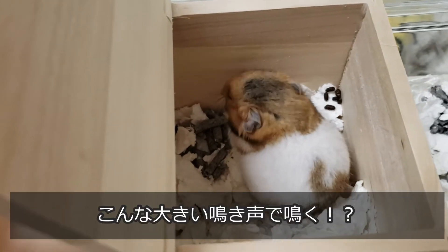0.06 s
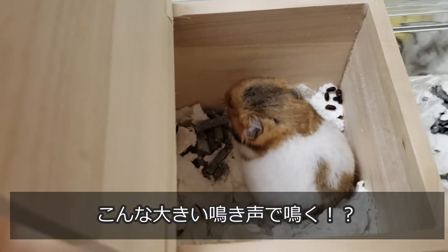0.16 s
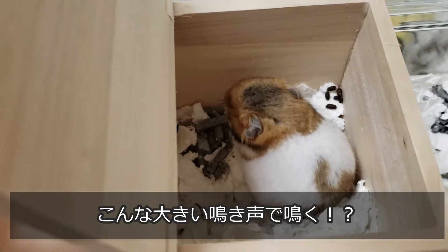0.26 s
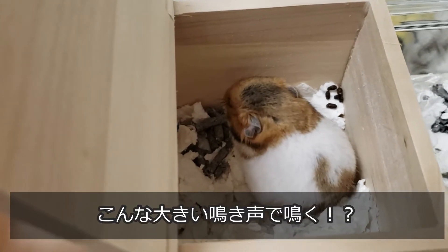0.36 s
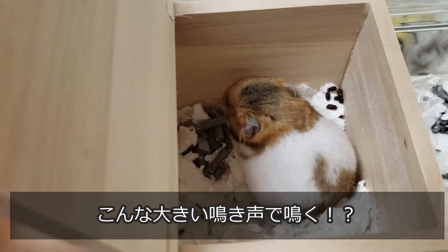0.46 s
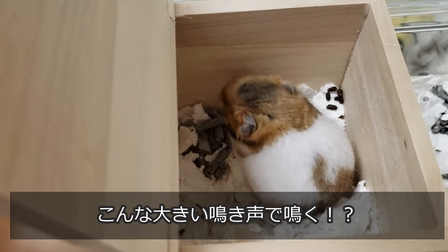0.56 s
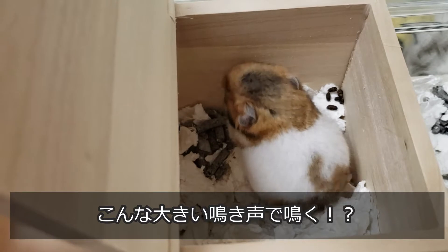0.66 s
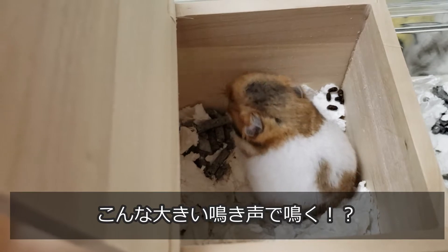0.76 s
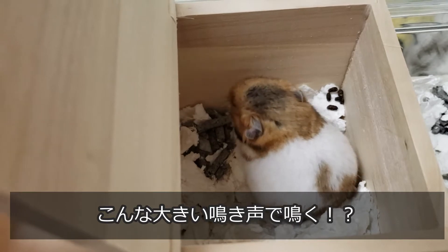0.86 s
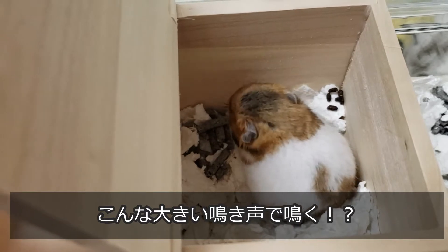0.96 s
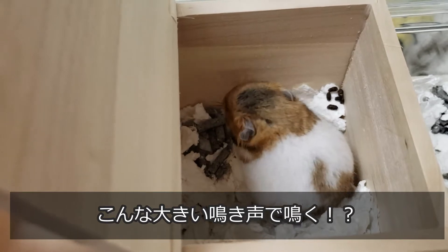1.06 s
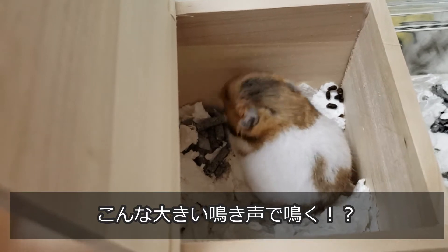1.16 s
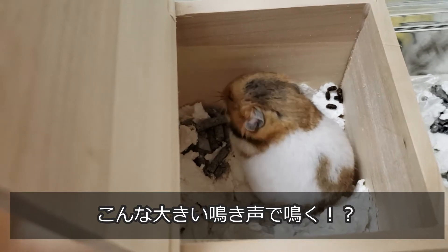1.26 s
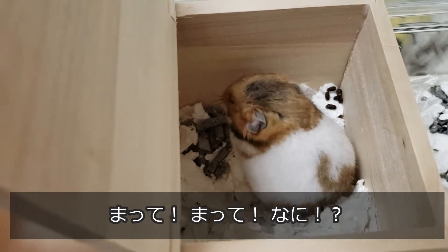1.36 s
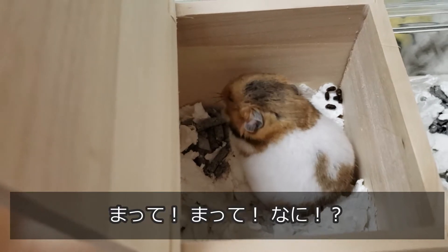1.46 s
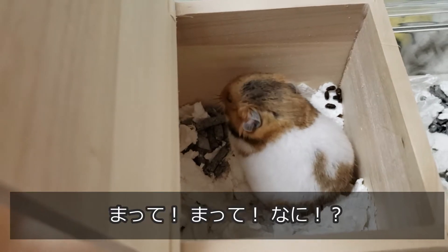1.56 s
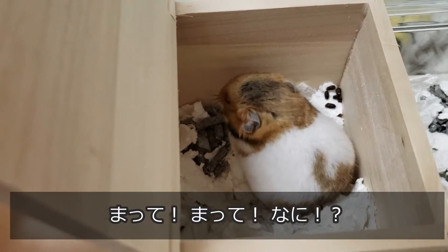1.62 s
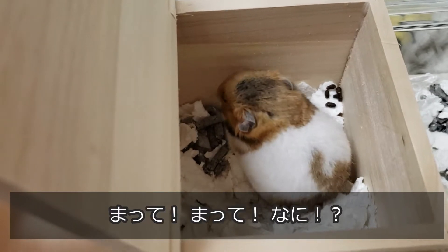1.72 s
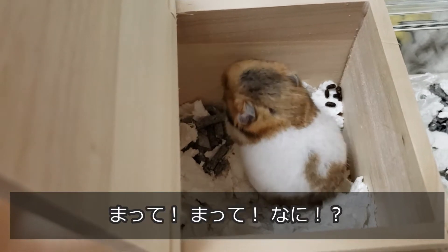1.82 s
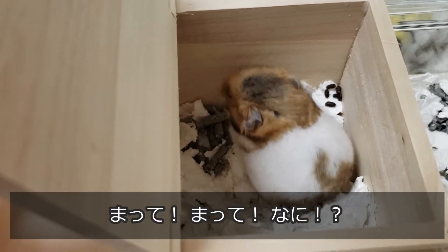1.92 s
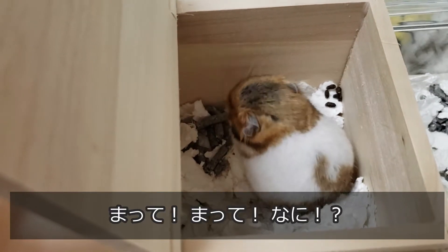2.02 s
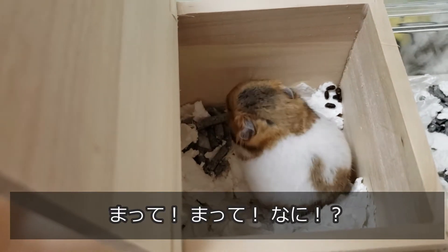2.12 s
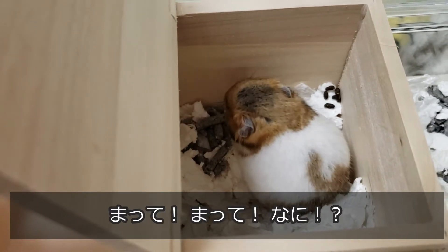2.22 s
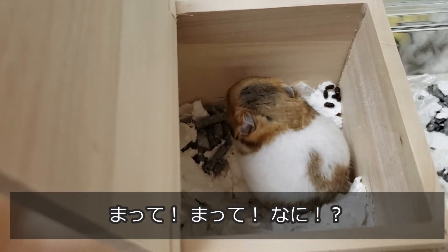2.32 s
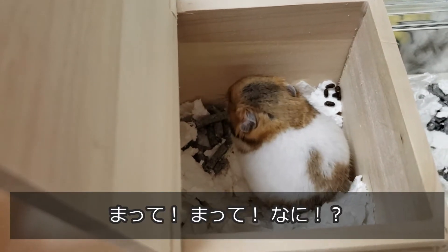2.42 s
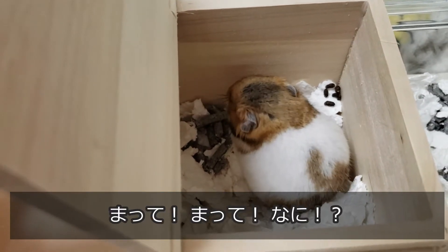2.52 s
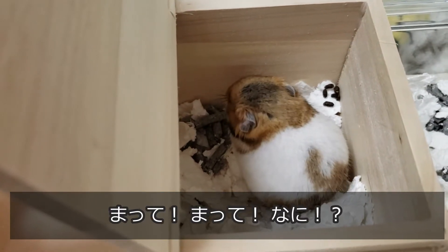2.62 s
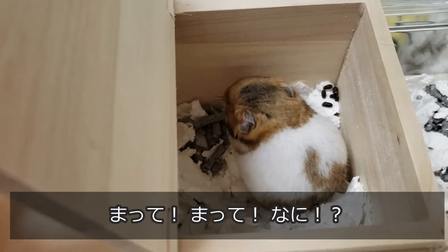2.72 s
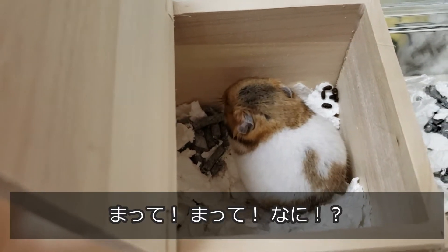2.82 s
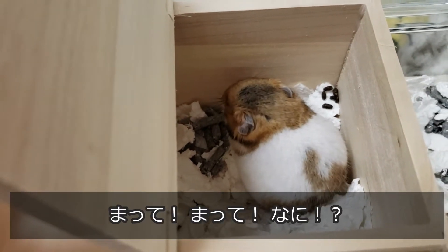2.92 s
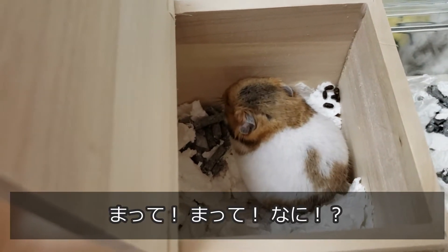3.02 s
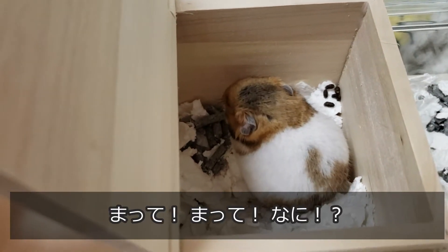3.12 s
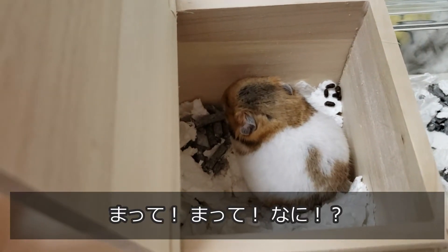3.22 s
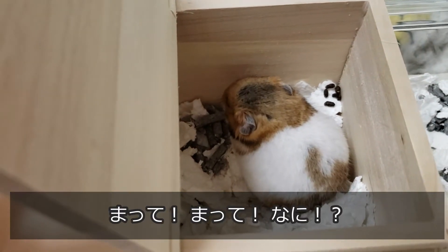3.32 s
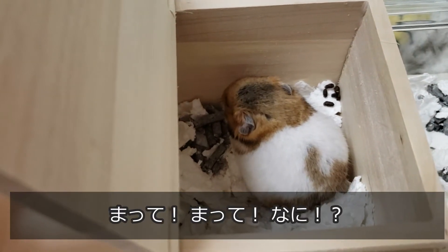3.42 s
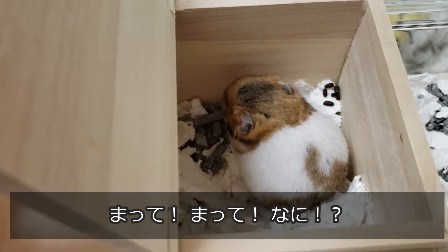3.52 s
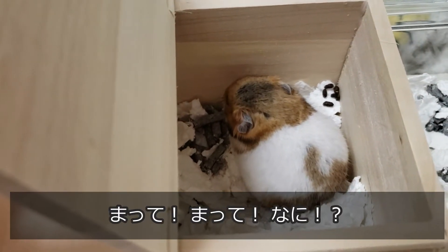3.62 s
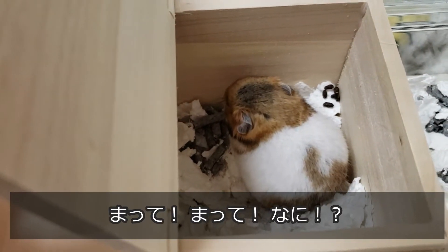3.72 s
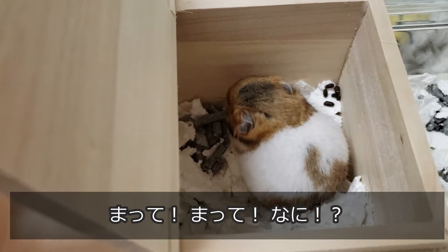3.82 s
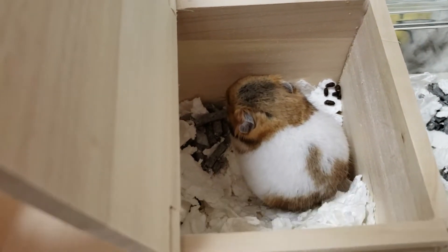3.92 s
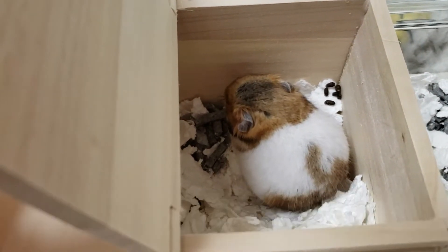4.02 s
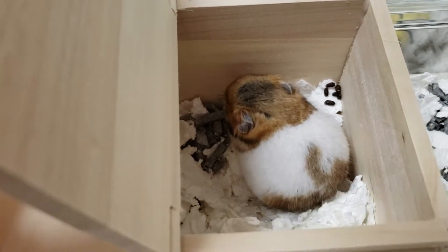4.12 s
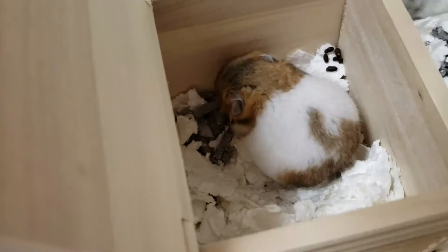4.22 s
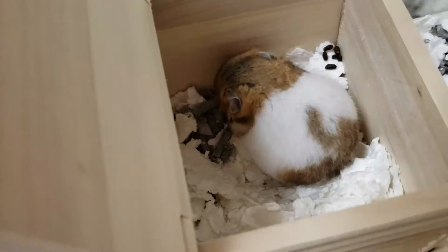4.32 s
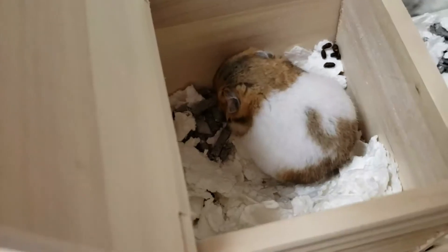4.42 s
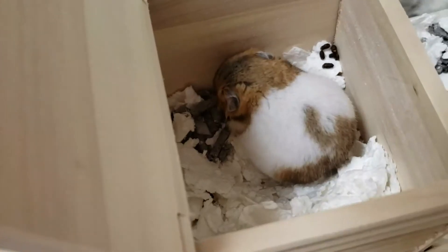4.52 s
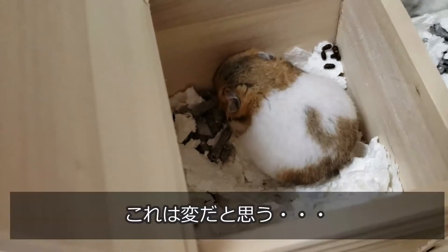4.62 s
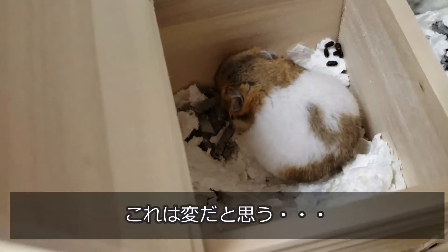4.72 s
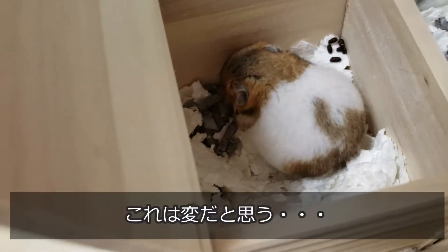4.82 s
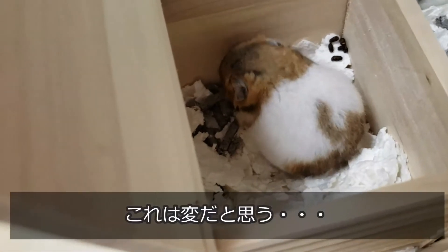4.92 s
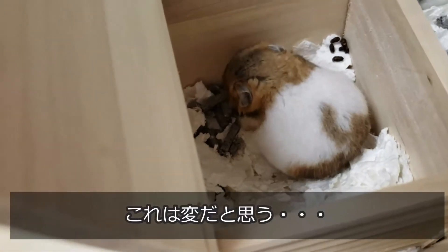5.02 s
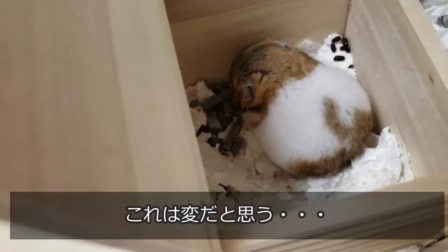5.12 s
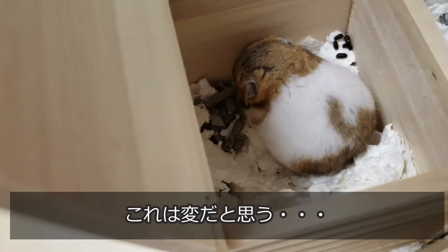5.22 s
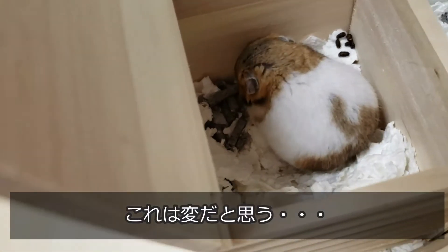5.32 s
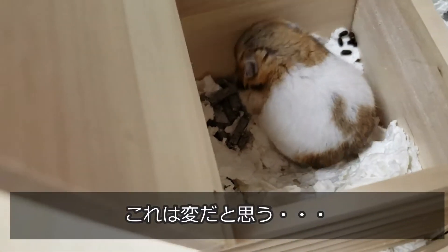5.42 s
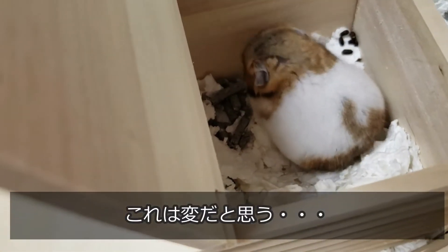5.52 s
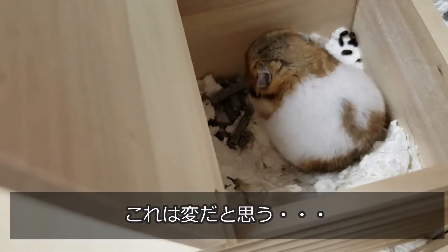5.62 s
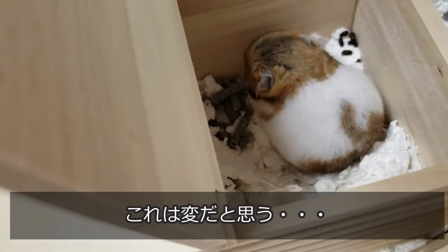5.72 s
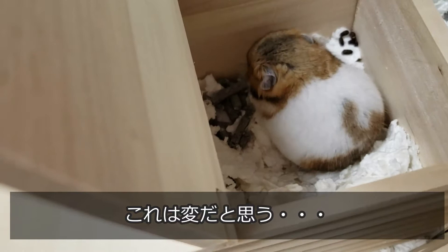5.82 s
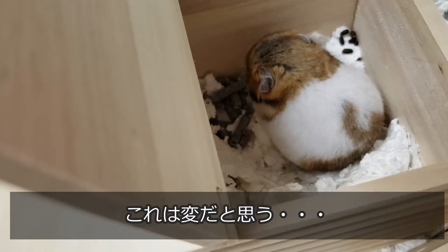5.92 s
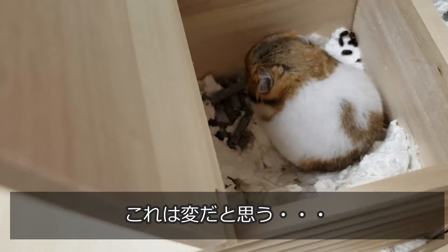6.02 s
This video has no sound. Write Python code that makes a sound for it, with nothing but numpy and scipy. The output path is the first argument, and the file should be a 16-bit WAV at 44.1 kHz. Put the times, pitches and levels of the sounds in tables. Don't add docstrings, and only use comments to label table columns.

```python
import sys
import numpy as np
from scipy import signal
from scipy.io import wavfile
from scipy.ndimage import uniform_filter1d

SR = 44100
rng = np.random.default_rng(int(sys.argv[2]) if len(sys.argv) > 2 else 0)


def undo_db(level):
    steps = np.asarray(level, float) / 20
    return 10 ** steps


def to_wav(sig):
    pcm = np.clip(np.atleast_2d(sig), -1, 1) * 32767
    pcm = np.round(pcm).astype(np.int16)
    wavfile.write(sys.argv[1], SR, pcm.T)


N = 267378
T = np.arange(N) / SR
SPLICE_S = 4.2759
AFTER = T > SPLICE_S
NEST_LAG_S, MOVED_LAG_S, GRIP_LAG_S = 0.00032, 0.000413, 0.000696


def evened(x):
    return x / np.sqrt(np.mean(x ** 2) + 1e-20)


def read(points, hz, column=1):
    points = np.asarray(points, float)
    return np.interp(np.log(hz + 1), np.log(points[:, 0] + 1), points[:, column])


def resonate(x, hz, width):
    r = np.exp(-np.pi * width / SR)
    if np.isscalar(hz):
        pole = r * np.exp(2j * np.pi * hz / SR)
        return 2 * signal.lfilter([1 - r], [1, -pole], x + 1e-18).real
    turn = np.exp(2j * np.pi * np.cumsum(hz) / SR)
    return 2 * (turn * signal.lfilter([1 - r], [1, -r], x / turn + 1e-18)).real


def envelope(rows):
    s, hz, db = np.transpose(rows)
    fade = np.clip(np.minimum(T - s[0], s[-1] - T) / .002, 0, 1)
    return fade * undo_db(np.interp(T, s, db))


def swells(s, db, lasts, t, roundness=1.13):
    away = np.abs(t - np.asarray(s)[:, None]) / np.abs(lasts)[:, None]
    return np.sqrt((undo_db(db[:, None] - 20 * away ** roundness) ** 2).sum(0) + undo_db(-200))


def voice(rows, gain, orders, waver=.01):
    s, hz = np.transpose(rows)[:2]
    unsteady = evened(uniform_filter1d(rng.standard_normal(N), 150))
    hz = np.interp(T, s, hz) * (1 + waver * unsteady)
    turns = 2 * np.pi * np.cumsum(hz) / SR
    return np.sqrt(2) * gain * sum(undo_db(db) * np.sin(k * turns) for k, db in orders)


def air(patchy_db=1.34):
    # f/Hz, correlation
    likeness = [(60, 1), (290, 0.79), (640, 0.93), (1400, 0.089), (3100, 0.0684), (7000, .02)]
    # f/Hz, left-right/dB
    tilt = [(60, -0.5), (180, -4.5), (550, 2), (1650, -3), (4970, 2.5), (15000, -0.5)]
    # f/Hz, density/dB per Hz
    rumble_colour = [(20, -29), (36, -4), (55, -19), (76, -6), (140, -15.5), (190, -8), (232, -10.5),
                     (268, -20.5), (370, -20), (420, -37), (565, -22), (750, -35)]
    # f/Hz, density/dB per Hz
    hiss_colour = [(380, -31), (650, -22), (723, -3), (1320, -9.5), (2540, -8), (3370, -13.5), (6400, -18),
                   (7320, -17.5), (8040, -24.5), (10400, -14.5), (15100, -9), (15900, -10)]
    # t/s, level/dB, time to lose 20 dB/s
    heaves = [
        (0.29, -55.5, 0.5),
        (1.2, -56.5, 1.4),
        (1.85, -54, 1),
        (2.18, -62.5, -2.5),
        (3.2, -55, 2),
        (4.0, -50, 0.2),
        (4.23, -55, 1),
        (5.2, -57, 2.2),
        (5.7, -55.5, 0.9),
        (5.96, -52.5, -3),
    ]
    frames, hz = N // 512 + 5, np.fft.rfftfreq(2048, 1 / SR)
    a, b, c, d, patches = rng.standard_normal((frames, 1025, 5)).T
    patches = evened(uniform_filter1d(uniform_filter1d(patches, 20, 0), 8, 1))
    same = np.clip(read(likeness, hz), -1, 1)[:, None]
    left = a + 1j * b
    z = np.array([left, same * left + np.sqrt(1 - same ** 2) * (c + 1j * d)])
    z[1] *= np.exp(-2j * np.pi * hz * NEST_LAG_S)[:, None]
    lean = read(tilt, hz) / 2
    heave_db = 20 * np.log10(swells(*np.transpose(heaves), np.arange(frames) * 512 / SR))
    deep = np.clip(2 - hz / 200, 0, 1)[:, None]
    swell_db = (heave_db - heave_db.mean()) * deep
    rumble = undo_db(read(rumble_colour, hz)) * (hz > 20) * (hz < 700)
    hiss = undo_db(read(hiss_colour, hz)) * (hz >= 700) * (hz < 15900)
    level = undo_db(-53.5) * evened(rumble) + undo_db(-63) * evened(hiss)
    z *= level[:, None] * undo_db(np.array([lean, -lean])[:, :, None] + patchy_db * patches + swell_db)
    sound = signal.istft(z, nperseg=2048, noverlap=1536)[1][:, :N]
    return np.sqrt(np.mean(level ** 2)) * evened(sound)


def pump_and_fan():
    # multiple of its speed, level/dB
    orders = [(1, -62.5), (2, -57), (2.495, -65), (2.635, -70), (3, -64), (5, -64), (6, -69)]
    pump_hz, fan_beat_hz = 36.002, 3.323
    pump = 2 * np.pi * pump_hz * T
    late = np.array([[0], [.35]])
    in_step_s = np.where(AFTER, 4.43, .1)
    beat = 2 * np.pi * fan_beat_hz * (T - in_step_s)
    lines = undo_db(-.5) * sum(undo_db(db) * np.cos(k * pump - late) for k, db in orders)
    fan = undo_db(-57.5) * np.cos(2 * pump + beat - late)
    side_line = undo_db(-67) * np.cos(2 * pump + 2 * beat - late)
    return np.sqrt(2) * (lines + fan + side_line)


def drone():
    # t/s, f/Hz, peak level/dB, time to lose 20 dB/s
    mode_swells = [(0.1, 230, -61, 0.5), (0.3, 231, -47.5, 0.36), (0.438, 229, -42, 0.01),
                   (0.62, 212, -59, 1), (0.79, 214, -52.5, -0.7), (0.95, 232, -57, -0.4),
                   (1.18, 235, -44.5, -0.16), (1.45, 228, -51.5, 0.8), (1.698, 237, -51.5, 0.14),
                   (1.87, 211, -50, -0.6), (2.14, 232, -43, -0.18), (2.229, 227, -48, -0.3),
                   (2.7, 227, -48, 0.12), (3.091, 230, -55, 0.32), (3.31, 215, -55, 0.6),
                   (3.719, 222, -57.5, 0.34), (3.968, 233, -48, 0.12), (4.228, 225, -44, 0.04),
                   (4.82, 230, -52, 0), (5.11, 233, -48.5, -0.12), (5.25, 227, -49, -0.24),
                   (5.421, 222, -52, -0.5), (5.621, 228, -67, -5.5), (5.8, 234, -53.5, -1.9),
                   (5.981, 233, -48, -0.3)]
    s, _, db, lasts = np.transpose(mode_swells)
    gain = np.interp(T, T[::64], swells(s, db, lasts, T[::64]))
    tone = voice(mode_swells, gain, [(1, 0.012)], waver=0.051)
    return np.array([tone, np.interp(T - NEST_LAG_S, T, tone)])


def duct():
    return undo_db(-71.5) * evened(resonate(rng.standard_normal(N), 373, 15.6))


def whine():
    # t/s, f/Hz, level/dB
    track = [
        (4.28, 9850, -74),
        (4.42, 10020, -70),
        (4.6, 9960, -72),
        (5.05, 10030, -74),
        (5.13, 9850, -71),
        (5.25, 10150, -74),
        (5.52, 10150, -70),
        (5.6, 10450, -76.5),
        (5.72, 10150, -75),
        (6.06, 10340, -74),
    ]
    wander_hz, width_hz, waver_db = 40, 100, .5
    wander, waver = evened(uniform_filter1d(rng.standard_normal((2, N)), 4000))
    hz = np.interp(T, *np.transpose(track)[:2]) + wander_hz * wander
    whistle = evened(resonate(rng.standard_normal((2, N)), hz, width_hz))
    return whistle * envelope(track) * undo_db(waver_db * waver)


def hum():
    low = pump_and_fan() + drone() + duct()
    return low * undo_db([[-1.7], [1.5]]) + whine() * undo_db([[-1], [-9]])


def splice_pop():
    return undo_db(-37) * AFTER * np.exp(-np.abs(T - SPLICE_S) / 0.0014)


def colour(points, column):
    hz = np.abs(np.fft.fftfreq(2048, 1 / SR))
    log_gain = np.log(undo_db(read(points, hz, column) - 40 * np.clip(1 - hz / 1000, 0, 1)))
    return np.fft.ifft(np.exp(np.conj(signal.hilbert(log_gain)))).real[:1024]


def to_microphones(high, low):
    # f/Hz, left/dB, right/dB
    near = [(960, -26, -13), (2750, -34, -20.5), (3610, -10, -7), (4230, -3.5, -2), (5540, -11.5, -3.5),
            (6000, -5.5, 4), (6850, -3.5, -14.5), (7540, -14, -16), (8260, -28.5, -48), (9400, -12, -15.5),
            (10450, -18.5, -25), (11900, -27.5, -43), (15500, -27, -34), (16000, -45, -44)]
    # f/Hz, left/dB, right/dB
    moved = [(1000, -16, -28), (2390, -22, 1.5), (3820, -22, -5), (5140, -2, -7), (5940, -12, -3),
             (6570, 10.5, -7), (7880, -4.5, -29), (8050, -19, -46), (9520, -11, -24), (10700, -11, -71),
             (12700, -15, -42), (14900, -7, -21), (16500, -33, -39)]
    # f/Hz, left/dB, right/dB
    grip = [(988, -36, -2), (2240, -21, -6.5), (3120, -4, -5.5), (3950, -13, -9), (4570, -1, -4),
            (5500, -11, -37), (5950, 9.5, 9), (6730, -1.5, -3.5), (8000, -12, -44), (9600, -6.5, -11.5),
            (16100, -25, -27)]
    out = np.zeros((2, N))
    gripped = (T > 2.4) & ~AFTER
    places = [(near, NEST_LAG_S, ~AFTER & ~gripped), (grip, GRIP_LAG_S, gripped), (moved, MOVED_LAG_S, AFTER)]
    for path, lag, on in places:
        taps = np.array([colour(path, 1), colour(path, 2)])
        taps = taps / np.sqrt((taps ** 2).sum() / 2)
        heard = signal.oaconvolve(high * on, taps, axes=1)[:, :N] + low * on
        out[0] += heard[0]
        out[1] += np.interp(T - lag, T, heard[1])
    return out


def walls(x):
    # f/Hz, t60/s
    decay = [(400, 0.153), (1500, 0.22), (5000, 0.2), (12000, 0.15)]
    taps = np.zeros((2, SR // 2))
    grid = np.arange(200, SR // 2 - 20, 20)
    at = grid + rng.integers(0, 20, (2, len(grid)))
    np.put_along_axis(taps, at, rng.choice([-1., 1.], at.shape), 1)
    hz, t, z = signal.stft(taps, SR, nperseg=256)
    tail = signal.istft(z * undo_db(-60 * t / read(decay, hz)[:, None]), SR, nperseg=256)[1]
    return signal.fftconvolve(x, tail / np.linalg.norm(tail[0]), axes=1)[:, :N]


def box(x):
    # f/Hz, width/Hz, level/dB
    modes = [(571, 75, 10.5), (482, 140, -1.5), (754, 150, -4.5)]
    return sum(undo_db(db) * resonate(resonate(x, hz, width), hz, 3 * width) for hz, width, db in modes)


def catch():
    # t/s, peak level/dB, extra bass/dB
    snaps = [
        (4.1636, -27, -4.5),
        (4.1652, -35, -4),
        (4.1693, -40, 0),
        (4.1801, -27.5, 2.5),
        (4.181, -31.5, 4.5),
        (4.1852, -36, 0.5),
        (4.1872, -40, -3),
        (4.1874, -40, 4),
    ]
    # f/Hz, level/dB, t60/s, left-right/dB
    modes = [(620, -11.5, 0.015, 2.5), (990, -12, 0.0089, 1), (1540, -19.5, 0.006, -13),
             (2270, -2.5, 0.014, -10.5), (2510, -5.5, 0.0086, -6), (2920, -4.5, 0.01, -11),
             (3500, -6, 0.012, 4.5), (4570, -8, 0.014, -2), (6120, 3, .012, 0), (6620, -5.5, .014, 11),
             (7520, -5, 0.0077, 11), (9700, -5, 0.0057, 9), (12100, 0, 0.0032, 4), (15000, -5, 0.0033, 16)]
    t, out = np.arange(800) / SR, np.zeros((2, N))
    attack = np.minimum(t / .0002, 1)
    phases = rng.random((len(snaps), len(modes)))
    for (s, db, bass_db), row in zip(snaps, phases):
        for (hz, mode_db, t60, pan_db), phase in zip(modes, row):
            decay = undo_db(db + mode_db + bass_db * (hz < 4000) - 60 * t / t60)
            ring = decay * np.sin(2 * np.pi * (hz * t + phase)) * attack
            for side, (lag, lean) in enumerate([(0, .5), (GRIP_LAG_S, -.5)]):
                out[side, round((s + lag) * SR):][:len(t)] += undo_db(lean * pan_db) * ring
    return out


def ticks():
    # t/s, peak level/dB, knock/dB, thud/dB, top edge/dB
    paper = [(0.2003, -52, -11, -19, -16), (0.3905, -59.5, -2, 6.5, -21), (0.4024, -56.5, -10, -1, -5),
             (0.4668, -48, -6, 0, -15), (0.558, -52.5, -10, -19, -11), (1.2143, -63, 6, 5.5, -8),
             (1.6576, -45.5, -15, 1, 11), (1.7175, -59, 0.5, 0, -8), (4.4613, -58.5, -11, -25, -15),
             (4.5751, -49.5, -44, -13, -17), (4.6164, -60, -13, -8, -3), (4.7649, -56.5, -20, -17, 1),
             (4.8792, -57, -5, -14, 1), (5.0588, -53, -27, -15, -10)]
    # t/s, peak level/dB, knock/dB, thud/dB, top edge/dB
    plastic = [(2.4893, -46, -28, -22, -7), (2.6173, -49, -6.5, 5, -13), (2.9218, -52.5, -5, 4.5, -11),
               (3.059, -39, -8, -19, -7), (3.0772, -38.5, -22, -7, -19), (3.4402, -55, -5, -20, -8),
               (3.579, -53, -14, -14, -13), (3.7151, -43, -15, -6.5, -12), (3.7228, -40, -19, -15, -28),
               (3.9948, -40, -30, -15, -2), (4.146, -60, -5, 1, -3)]
    # t/s, peak level/dB, knock/dB, thud/dB, top edge/dB
    teeth = [
        (0.7522, -36.5, -27, -8, -18),
        (1.8653, -46, -9, -30, -21),
        (3.4607, -37.5, -15, -13, -18.5),
        (4.5301, -45, -18, -14.5, -30),
        (5.2689, -34, -12, -23, -21),
        (5.4398, -37.5, 3, 9, -20),
    ]
    t = np.arange(2000) / SR
    knocks = [(paper, 2070), (plastic, 2250), (teeth, 3650)]
    rows = sorted((*row, hz) for kind, hz in knocks for row in kind)
    dying = (undo_db(-60 * t / .009) + undo_db(-13 - 60 * t / .035)) * np.minimum(t / .0002, 1)
    noise = undo_db(-3) * rng.standard_normal((len(rows), 3, len(t)))
    noise[:, 2, 8] = undo_db(14.5)
    crack, knock, edge, thud = np.zeros((4, 2, N))
    for (s, db, knock_db, thud_db, edge_db, _), z in zip(rows, noise):
        start = round((s + 0.00055) * SR)
        at = slice(start, start + len(t))
        burst = undo_db(db) * dying * (1.05 * z[:2] + z[2])
        crack[:, at] += undo_db(-1.5) * burst
        knock[:, at] += undo_db(knock_db + 16.0) * burst
        edge[:, at] += undo_db(edge_db - 11.0) * burst
        thud[:, at] += undo_db(thud_db + 21) * undo_db(db) * dying * z[2]
    knock = signal.sosfilt(signal.butter(4, 1750, "high", fs=SR, output="sos"), knock)
    edge = signal.sosfilt(signal.butter(4, 9500, "high", fs=SR, output="sos"), edge)
    starts, knock_hz = np.transpose(rows)[[0, -1]]
    latest = np.clip(np.searchsorted(starts, T) - 1, 0, None)
    knock_hz = knock_hz[latest]
    knock = resonate(resonate(knock, knock_hz, 630), knock_hz, 930)
    return crack, knock + box(thud) + edge * undo_db([[3], [-3]])


def bumps():
    # t/s, peak level/dB, f/Hz, t60/s
    hits = [
        (5.44, -32, 340, 0.023),
        (5.447, -44.5, 385, 0.26),
        (4.181, -47, 424, 0.073),
    ]
    out, t = np.zeros(N), np.arange(SR // 5) / SR
    for s, db, hz, t60 in hits:
        out[round(s * SR):][:len(t)] += undo_db(db - 60 * t / t60) * np.sin(2 * np.pi * hz * t)
    return out


def coo():
    # t/s, f/Hz, level/dB
    track = [
        (5.463, 720, -48),
        (5.47, 705, -35),
        (5.476, 690, -26),
        (5.481, 670, -24),
        (5.486, 640, -31),
        (5.494, 620, -45),
    ]
    # multiple, level/dB
    orders = [(1, 4), (2, -14), (3, -31), (4, -29)]
    return voice(track, envelope(track), orders, waver=0.0051)


def peep():
    # t/s, f/Hz, level/dB
    track = [
        (1.826, 1605, -69),
        (1.845, 1614, -63.5),
        (1.856, 1510, -61),
        (1.866, 1447, -54),
        (1.872, 1437, -72),
    ]
    # multiple, level/dB
    orders = [(1, 9.5), (2, 4), (4, -5), (6, -3)]
    # t/s, f/Hz, level/dB
    wheeze = [
        (1.828, 3930, -49),
        (1.836, 3960, -51),
        (1.841, 4350, -53),
        (1.853, 4500, -42),
        (1.86, 4280, -46),
        (1.872, 4330, -49.5),
    ]
    squeak = voice(track, envelope(track), orders, waver=.02)
    whistle = voice(wheeze, envelope(wheeze), [(1, -9)], waver=.015)
    return undo_db([[-7], [3.5]]) * (squeak + whistle)


def spurts():
    # t/s, peak level/dB, ring f/Hz
    drops = [(0.1052, -33, 5970), (0.1105, -34, 5000), (0.1114, -32, 5910), (0.1125, -38, 4250),
             (0.1095, -40, 1100), (0.4974, -57, 6850), (0.6714, -32, 5930), (0.6764, -25, 5790),
             (0.6833, -25, 6020), (0.6874, -24, 5780), (0.6913, -20, 6070), (0.6944, -17, 6080),
             (0.7034, -17, 6050), (0.7234, -33, 5850), (0.7527, -31, 5880), (1.8704, -22, 6090),
             (1.8804, -25, 5650), (1.8884, -28, 5950), (1.9044, -30, 6030), (1.9154, -31, 6010),
             (3.0769, -41, 6020), (3.4607, -43, 3500), (3.7155, -46, 2300), (3.9952, -50, 2950),
             (5.2692, -39, 3980), (3.9948, -37, 6030), (5.2814, -47, 7030), (5.4514, -35, 6590),
             (5.4754, -31, 6790), (5.4804, -31, 6660)]
    t = np.arange(300) / SR
    phases, out = rng.random(len(drops)), np.zeros((2, N))
    shape = t / .0006 * np.exp(1 - t / .0006)
    for (s, db, hz), phase in zip(drops, phases):
        ring = undo_db(db - 3.0) * shape * np.sin(2 * np.pi * (hz * t + phase))
        out[:, round((s + .0006) * SR):][:, :len(t)] += ring
    return out * undo_db([[-2.5], [2.5]])


def breath(column):
    # t/s, length/s, nose hiss/dB, chest and box boom/dB, middle rasp/dB
    snuffles = [
        (0.104, 0.017, -44, -42, -45.5),
        (0.108, 0.0074, -54, -33, -45),
        (0.122, 0.039, -65, -59, -63),
        (0.466, 0.031, -63, -58, -69),
        (0.487, 0.019, -61, -57, -70),
        (1.653, 0.0085, -62, -50, -67),
        (1.672, 0.039, -65.5, -59, -67),
        (2.078, 0.092, -82, -62.5, -70),
        (5.266, 0.048, -59, -74, -66),
    ]
    # t/s, length/s, nose hiss/dB, chest and box boom/dB, middle rasp/dB
    sneezes = [(0.663, 0.0092, -54, -58, -51), (0.670, 0.02, -37, -53, -52),
               (0.684, 0.004, -40, -30.5, -42), (0.683, 0.029, -31.5, -36, -35),
               (0.694, 0.0049, -28, -28, -25.5), (0.699, 0.011, -30, -42, -27.5),
               (0.7039, 0.008, -45, -30.5, -33), (0.708, 0.018, -39, -49, -60),
               (0.729, 0.018, -53, -48, -69), (0.754, 0.0058, -43, -47, -62), (0.76, 0.026, -58, -56, -64),
               (1.829, 0.042, -62, -61, -63), (1.855, 0.016, -49, -52, -53),
               (1.865, 0.023, -30.5, -47.5, -50), (1.886, 0.0056, -33, -32.5, -56),
               (1.891, 0.027, -37.5, -42.5, -47.5), (1.922, 0.015, -63, -47, -60),
               (1.943, 0.025, -55.5, -53, -58), (1.968, 0.03, -64.5, -57, -59),
               (5.439, 0.036, -43, -43, -47.5), (5.463, 0.02, -40, -42, -42.5),
               (5.484, 0.014, -47, -70, -56), (5.508, 0.043, -64.5, -54, -62.5)]
    attack_s, sag_db, release_db_per_s = 0.0015, 5.5, 2502
    power, t = np.zeros(N), np.arange(SR // 8) / SR
    for row in [*snuffles, *sneezes]:
        start, length = row[:2]
        db = row[column] - sag_db * t / length - release_db_per_s * np.maximum(t - length, 0)
        power[round(start * SR):][:len(t)] += (np.minimum(t / attack_s, 1) * undo_db(db)) ** 2
    return np.sqrt(power)


def puffs(sputter_db=2.5, alike=0.66):
    # f/Hz, width/Hz, level/dB
    throat = [(1117, 120, 12.5), (1257, 95, 16.5), (1886, 180, 8), (2456, 96, 11.5), (3167, 200, 3)]
    slow = uniform_filter1d(uniform_filter1d(rng.standard_normal(N), 60), 60)
    sputter = undo_db(sputter_db * evened(slow))
    shared, apart = rng.standard_normal((3, N)), rng.standard_normal((2, N))
    hiss = sputter * (alike * shared[0] + np.sqrt(1 - alike ** 2) * apart)
    hiss = evened(hiss) * breath(column=2)
    rasp = sum(undo_db(db) * resonate(resonate(shared[1], hz, width), hz, 2 * width) for hz, width, db in throat)
    rasp = evened(sputter * rasp) * breath(column=4)
    boom = evened(box(sputter * shared[2])) * breath(column=3)
    return undo_db(4.5) * hiss, undo_db(2.0) * boom + undo_db([[-4], [1.5]]) * rasp


def scene():
    hiss, boom = puffs()
    crack, knock = ticks()
    nest = to_microphones(hiss + crack, boom + knock + spurts() + peep())
    low = coo() + bumps()
    low = np.array([low, np.interp(T - MOVED_LAG_S, T, low)])
    snaps = catch()
    wet = walls(nest + undo_db(-5.5) * low + undo_db(-10) * snaps)
    return nest + low + snaps + undo_db(-19) * wet + air() + hum() + splice_pop()


def band_limit(x):
    return signal.sosfilt(signal.butter(12, 16990, fs=SR, output="sos"), x)


def record(dry):
    edge = signal.firwin(511, 16500, window=("kaiser", 9), fs=SR)
    mix = signal.oaconvolve(dry, edge[None], "same")
    return band_limit(mix)


dry = scene()
out = record(dry)
to_wav(out)
```